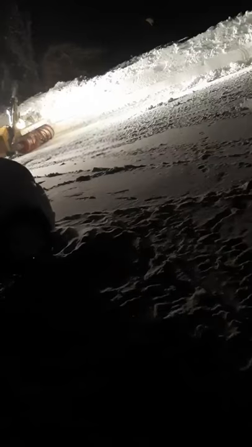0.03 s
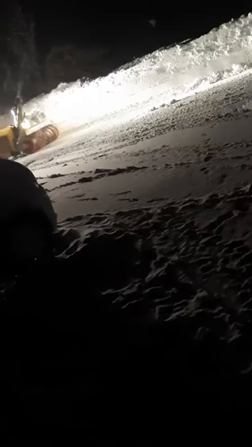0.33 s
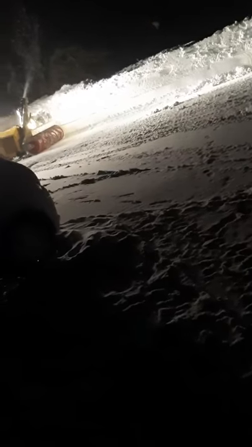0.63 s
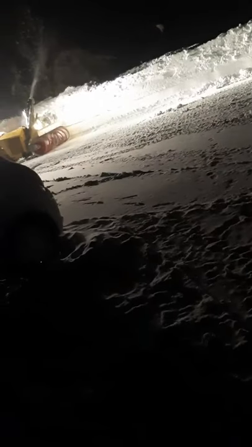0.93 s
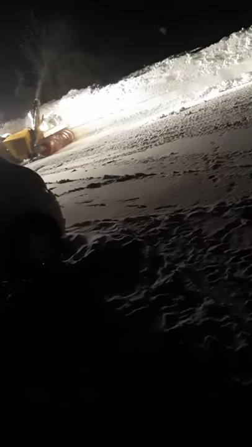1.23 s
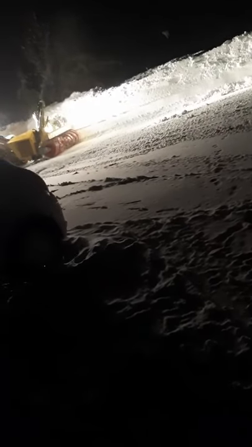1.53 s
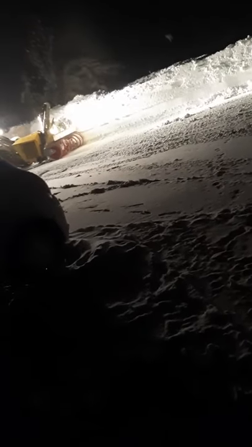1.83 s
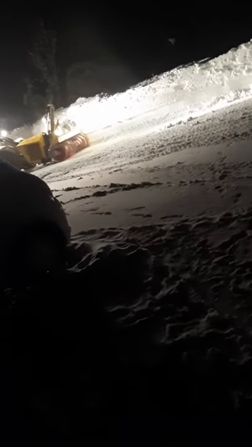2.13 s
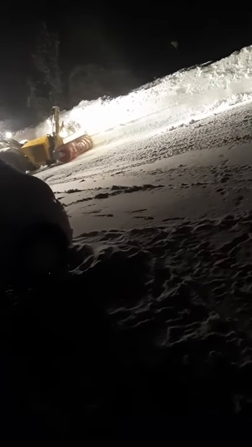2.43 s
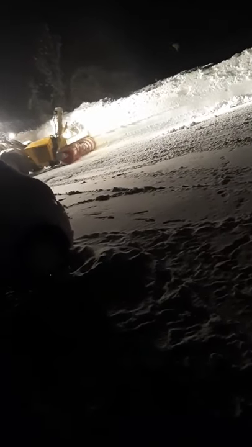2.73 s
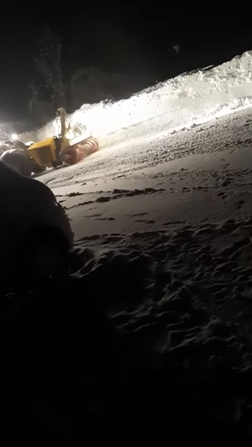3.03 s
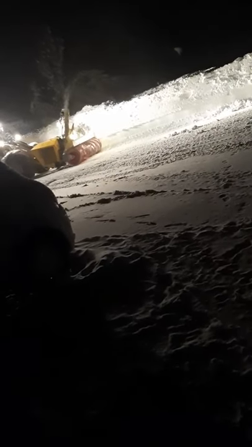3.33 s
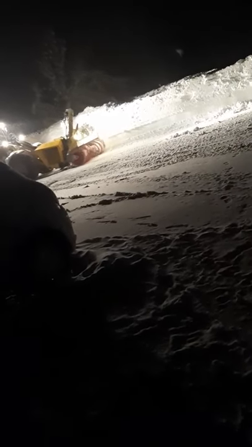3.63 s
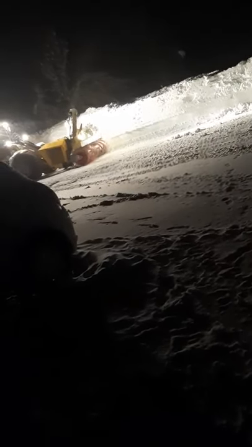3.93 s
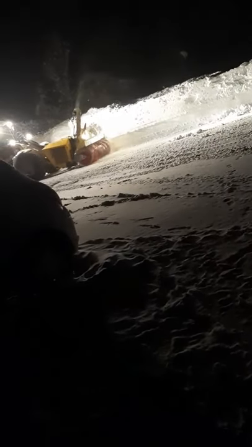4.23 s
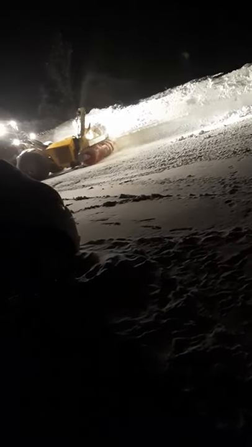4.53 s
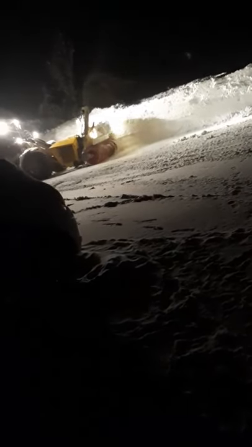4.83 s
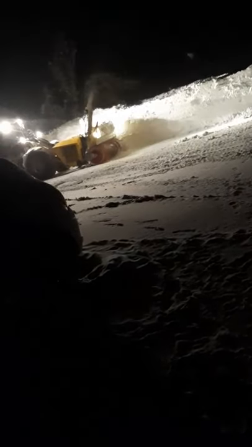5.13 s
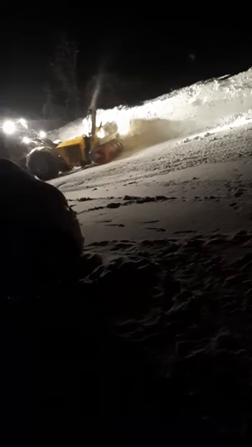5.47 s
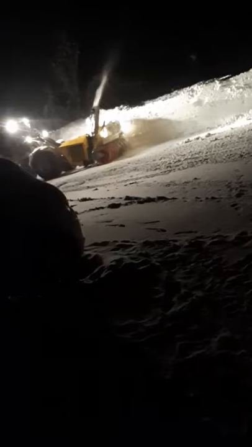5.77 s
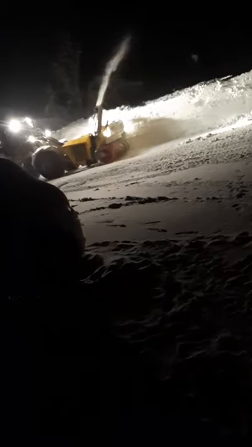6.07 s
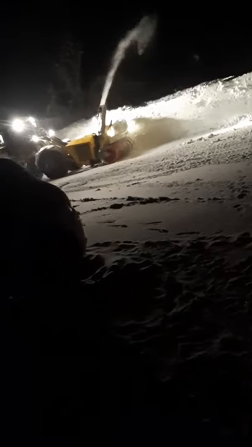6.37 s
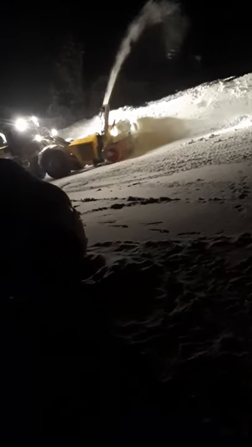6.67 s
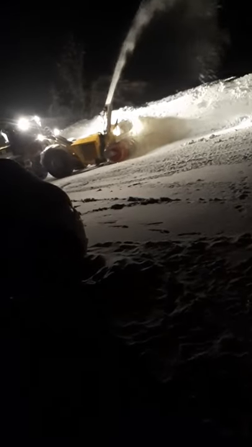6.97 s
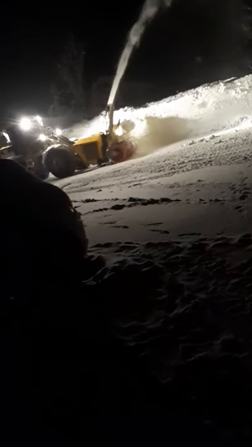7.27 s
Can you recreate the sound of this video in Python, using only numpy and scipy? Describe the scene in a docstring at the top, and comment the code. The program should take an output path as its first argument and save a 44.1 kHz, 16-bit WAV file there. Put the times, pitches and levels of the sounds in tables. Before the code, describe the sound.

A diesel tractor with a front snow blower runs at working speed throughout, outdoors and a little way off. A low engine drone and the throb of the impeller beat slowly against each other, over a rumble, injector clatter and faint gear tones. The sound opens up slightly over the first two seconds. From about 1 to 2.4 seconds a light bite of snow brings a swelling, grainy hiss and a faint, very high turbo whistle. The hiss thins, then swells again around 3.5 seconds, and a few harder engine knocks stand out between 2.5 and 4.4 seconds. At about 5.1 seconds a chip of ice lightly strikes the chute. From 5.3 seconds the auger digs deep: the hiss returns, a rough growl builds from about 6 seconds, the engine sags very slightly, and the turbo whistle climbs and grows until the end at 7.4 seconds.

```python
"""A tractor with a front snow blower creeps out from behind a snow bank at night, diesel at working speed.
From the start the impeller throbs at nearly half the firing rate, so the two beat slowly, while
injectors clatter and gears sing. A light first bite of snow stirs the turbo, and the hiss swells and
thins as loose snow goes up the chute. After five seconds an ice chip strikes the chute; then the auger
bites deep: the packed impeller growls, the speed sags a little and the turbo whistles up."""
import sys
import numpy as np
from scipy import signal
from scipy.fft import rfft, irfft
from scipy.io import wavfile
from scipy.ndimage import uniform_filter1d

SR = 44100
rng = np.random.default_rng(int(sys.argv[2]) if len(sys.argv) > 2 else 0)


def wrap_up_sound(samples):
    """Save the sound to the file named by the first command line argument, as 16-bit audio."""
    columns = np.atleast_2d(samples).T
    # keep every value between -1 and 1, then stretch to whole-number steps
    tamed = np.clip(columns, -1, 1)
    steps = np.round(tamed * 32767).astype(np.int16)
    wavfile.write(sys.argv[1], SR, steps)


N = 326340
TIME = np.arange(N) / SR
FREQS = np.maximum(np.arange(N // 2 + 1) * SR / N, 1)

BLADE_HZ, DROOP_HZ = 36.586, .306  # the governor holds the blade rate, giving a little under load
BLADES_PER_CYCLE = 1.96625  # blade passes per engine cycle
BLADE_START, CRANK_OFFSET = .42, -.1  # in blade passes, in engine cycles
KNOCK_LAG, TICK_LAG = .16, .19  # engine cycles after each exhaust pulse
PACK_FROM, PACK_FULL = .39, 1  # loads at which snow starts to pack the impeller, and fills it
EMERGE_S, EMERGE_FADE_S = .64, 1.0  # when the bank's shielding starts to fade, and its time constant

# The impeller's throb. Each row: multiple of the blade rate, level in dB, how strongly it follows
# the bank's shielding as a factor, dB gained when packed.
THROB_PARTIALS = [(2, -33.5, 0.8, 6.5), (3, -29.5, 0.14, 1.5), (4, -38, 0, 10.5), (5, -26.5, 0.8, -2),
                  (6, -28.5, 0.9, -1.5), (7, -41, 2.2, 0), (8, -49.5, 1.0, 1)]
# The throb shifts as the tractor moves. Each row: time in seconds, dB added to partial 3, to partial 5.
THROB_SWELLS = [(0, 1, 1), (1.3, 0.5, -1), (2.2, 0.5, -2.1), (3.2, 0.6, 0.8), (4.301, -1, 1.2),
                (5.6, -3.5, -3), (6.901, -2, -2.5)]
# The voice of the snow-packed housing. Each row: frequency in Hz, gain in dB.
PACKED_HOUSING = [(330, 1), (370, -4), (430, -16), (540, -9), (585, 0), (622, 2.5), (658, -6), (695, 3),
                  (732, 2.5), (765, -8), (860, -9), (950, -3), (1020, -5), (1080, -8), (1130, -5)]
# Lumps of snow make the growl surge. Each row: centre in seconds, half length in seconds, boost in dB.
SNOW_LUMPS = [(6.79, .05, 4), (7.3, .1, 2)]
# The auger's bites. Each row: start in seconds, end in seconds, load it builds toward (1 is full).
AUGER_BITES = [(1.0, 2.39, .58), (5.28, 7.4, 1.5)]
# The exhaust's drone. Each row: multiple of the engine cycle, level in dB.
EXHAUST_ORDERS = [(4, -26.1), (5, -54), (6, -43), (7, -53), (8, -41), (9, -52), (10, -51), (11, -52),
                  (12, -49), (13, -51), (14, -55), (15, -53), (16, -57), (17, -57), (18, -55), (19, -57),
                  (20, -58), (21, -58)]
# Four cylinders in firing order. Each row: accents in dB for block knock, valve cover rattle and
# injector tick, then knock delay in firing intervals.
CYLINDER_ACCENTS = [(2, -1, 3, .2), (7, 0, 1.5, 0), (-1.5, 1, 0, .16), (-4.5, 0, 0, .12)]
# Knocks that stand out from the rest. Each row: time in seconds, level in dB.
KNOCK_HITS = [(.328, -32), (2.479, -30), (2.910, -29), (2.974, -32), (3.028, -31), (3.082, -32),
              (3.125, -29), (4.146, -29), (4.414, -28)]
# Harder rasp in the first bite. Each row: centre in seconds, half length in seconds, boost in dB.
INJECTOR_SWELLS = [(1.9, 0.5, 1)]
# Gear tones. Each row: multiple of the engine cycle, relative level in dB, dB gained when packed.
GEAR_TONES = [(52, -56, 5), (59, -55, 3), (63.93, -49, 9), (69.97, -52, 13), (71.8, -58, 9),
              (73.8, -57, 10), (81.1, -55, 9), (90, -55, 0), (110, -61, 5), (145, -54, 3), (225, -59, 0)]
# The turbo whistle comes and goes. Each row: time in seconds, level change in dB.
WHISTLE_SWELLS = [(0, -6), (1.0, -1), (2.0, 2), (2.5, -5), (3.45, 6), (4.2, -8), (5.2, -1), (5.5, -3),
                  (5.72, 7), (6.0, -2), (6.65, 2), (7.4, -1)]
# The hydraulic motor's wandering hum. Each row: time in seconds, pitch in Hz.
MOTOR_PITCH = [(0.0, 54.8), (1.79, 52), (4.18, 52.66), (5.89, 48.5), (6.1, 58.1), (7.21, 53.8), (7.4, 59.5)]
# Thick and thin snow in the chute. Each row: centre in seconds, half length in seconds, flow in dB.
SNOW_PATCHES = [(1.97, 1, 9), (2.75, 0.61, -8.5), (3.556, 0.43, 9), (4.13, .22, -2), (5.6, 0.86, 4),
                (7.136, 0.26, 7.5)]
# Ice striking the chute. Each row: time in seconds, level in dB.
CHIP_HITS = [(5.148, -30.5)]

# Tone colours of the noisy layers. Each row: frequency in Hz, relative level in dB.
RUMBLE_COLOUR = [(25, -18), (45, -11), (70, -6.5), (100, 0), (160, 1), (240, -5.5), (300, -13.5),
                 (400, -14.5), (480, -22.5), (800, -37.5)]  # air in the impeller housing
BLOCK_COLOUR = [(500, -10.5), (850, -12), (1050, -6), (1250, 4), (1400, 1), (1550, 0), (1800, -10),
                (2200, -28), (3000, -58)]  # engine block
COVER_COLOUR = [(1400, 2), (1850, 6.5), (2080, 10), (2350, 6.5), (2700, 12.5), (2900, 1.5), (3080, -3.5),
                (3300, -32), (3550, -2), (3900, -14.5)]  # valve cover
PIPE_COLOUR = [(3400, -15), (3620, 9), (3800, -5.5), (3930, -6), (4180, 4), (4400, 5.5), (4520, -15),
               (4700, 3), (5000, -12.5), (5500, -2.5), (5900, -10.5)]  # injectors and their steel pipes
CHURN_COLOUR = [(300, -36), (470, 0), (650, -0.5), (850, 1.5), (1000, 0.5), (1300, -8)]  # snow in the auger housing
HISS_COLOUR = [(2600, 0), (3400, -5), (4250, 0), (5300, -4), (6200, -10), (7000, -3.5), (7900, -8.5),
               (8500, -28), (9700, -22), (10500, -14), (12000, -17), (12900, -27)]  # grains on steel
SPRAY_COLOUR = [(5000, -22), (7500, 11), (8600, -30), (9700, -11), (10600, 5), (12000, 4), (13000, -5)]  # the airy top of the snow spray
CHUTE_COLOUR = [(1800, 0), (2400, 3), (2900, 0), (3300, 7), (3900, -3), (6000, -11), (7500, -7),
                (8800, -22), (11000, -20)]  # the struck chute

# The stereo image. Each row: frequency in Hz, left minus right in dB.
STEREO_BALANCE = [(60, -2), (140, -2), (310, -5), (470, -4), (710, 3.5), (1070, -4.5), (1620, -3.5),
                  (2440, -3.5), (3700, -0.5), (8400, 3.5), (12700, -0.5)]
# The right side lags, most in the bass, which bends round the microphones.
# Each row: frequency in Hz, lag in seconds.
RIGHT_LAG = [(250, 0.00021), (1300, 0.00011), (2500, 0.00015), (5000, 0.0001965)]


def impeller(blade, shield_db, packed, growl_db):
    """Each blade pushes a puff: bass leaves the housing at once, the rest by the chute, late, inverted."""
    chute_from = 4  # lowest partial that takes the chute
    chute = blade - .078  # delay in blade passes
    swells = dict(zip((3, 5), in_time(THROB_SWELLS)))
    throb = growl = 0
    for k, db, follows, packed_db in THROB_PARTIALS:
        turns = k * blade if k < chute_from else k * chute + .5
        level_db = db + follows * shield_db + packed_db * packed + swells.get(k, 0)
        throb += tone(turns, level_db, waver_db=.35, waver_hz=2, jitter=.04)
    # packed snow adds a growl of rough upper partials
    for k in range(9, 32):
        partial = tone(k * chute + .35 * rng.random(), growl_db, waver_db=3, waver_hz=18, jitter=.7)
        growl += gain_at(PACKED_HOUSING, k * BLADE_HZ) * partial
    return throb + np.sqrt(packed) * from_db(bumps(SNOW_LUMPS)) * growl


def exhaust(cycle, gain_db):
    """The firing note, trailed by the weaker orders that unequal cylinders leave."""
    uneven_lag, smeared_above = .287, 8  # engine cycles; the silencer smears phases above this order
    drone = 0
    for k, db in EXHAUST_ORDERS:
        lag = uneven_lag * (k != len(CYLINDER_ACCENTS))
        smear = rng.random() * (k > smeared_above)
        drone += from_db(db) * sine(k * (cycle - lag) + smear)
    return from_db(gain_db) * drone


def rumble(blade, level_db, depth, lag, diffuse_hz):
    """Turbulence in the housing, pumped by each blade; its upper part arrives from all sides."""
    pumping = 1 + depth * np.cos(2 * np.pi * (blade - lag))
    low_cut = np.minimum(FREQS / diffuse_hz, 1) ** 2
    diffuse = irfft(rfft(rng.standard_normal((2, N))) * low_cut, N)
    return from_db(level_db) * colour(pumping * (rng.standard_normal(N) + diffuse), RUMBLE_COLOUR)


def diesel(cycle, level_db, cover_db):
    """The cylinders knock in the block, two of them hard, and rattle more brightly in the valve cover."""
    knock_db, rattle_db, _, delays = np.transpose(CYLINDER_ACCENTS)
    knocks = firings(cycle - KNOCK_LAG, knock_db, decay=.3, base=.85, uneven_db=1, delays=delays)
    block = clatter(cycle, knocks, BLOCK_COLOUR, repeat=.45, scatter=.27)
    taps = firings(cycle - TICK_LAG, rattle_db, decay=.16, base=1.2, uneven_db=1.6)
    cover = clatter(cycle, taps, COVER_COLOUR, repeat=.3, scatter=.18)
    hard_knocks = strikes(KNOCK_HITS, BLOCK_COLOUR, contact_s=.003)
    return from_db(level_db) * (block + from_db(cover_db) * cover) + hard_knocks


def injectors(cycle, level_db):
    """Each injection ticks and sets the steel pipes ringing: a coarse, regular rasp."""
    tick_db = np.array(CYLINDER_ACCENTS)[:, 2]
    ticks = firings(cycle - TICK_LAG, tick_db, decay=.2, base=1.1, uneven_db=2.5)
    rasp = clatter(cycle, ticks, PIPE_COLOUR, repeat=.35, scatter=.4)
    return from_db(level_db + bumps(INJECTOR_SWELLS)) * rasp


def gears(cycle, gain_db, packed):
    """Timing gears and gearbox sing; most tones rise with the torque of a packed impeller."""
    tones = sum(tone(k * cycle + rng.random(), db + packed_db * packed, waver_db=3, waver_hz=22, jitter=.79)
                for k, db, packed_db in GEAR_TONES)
    return from_db(gain_db) * tones


def churn(blade, level_db, packed, depth):
    """Snow tumbles in the auger housing: an even roar that pulses with the blades once they pack."""
    pumping = 1 + depth * packed * np.cos(2 * np.pi * (blade - BLADE_START))
    return from_db(level_db) * colour(scattered_noise(pumping, scatter=.15), CHURN_COLOUR)


def turbo(load, idle_db, boost_db, blur_hz, flutter_hz, echo_gain):
    """The compressor whistle climbs, grows and flutters as the turbo spools up; its echoes blur it."""
    idle_hz, rise_hz, spool_s = 10399, 1374, .51
    pole = np.exp(-1 / (spool_s * SR))
    boost = load
    for _ in range(2):  # the spool lags behind the load
        boost = signal.lfilter([1 - pole], [1, -pole], boost)
    hz = idle_hz + rise_hz * boost + flutter_hz * boost ** 2 * drift(60)
    angle = 2 * np.pi * np.cumsum(hz) / SR
    direct, left, right = [np.sqrt(2) * np.cos(angle + drift(blur_hz)) for _ in range(3)]
    swell_db, = in_time(WHISTLE_SWELLS)
    level_db = idle_db + boost_db * boost ** 1.5 + swell_db + 2 * drift(4)
    return from_db(level_db) * (direct + echo_gain * np.array([left, right]))


def hydraulics(cycle, motor_db, pump_db):
    """The hydraulic motor hums at a wandering pitch of its own; its pump is geared to the engine."""
    motor_hz, = in_time(MOTOR_PITCH)
    motor = tone(np.cumsum(motor_hz) / SR, motor_db, waver_db=4.5, waver_hz=2.5, jitter=.059)
    pump = tone(11.43 * cycle, pump_db, waver_db=1.2, waver_hz=2, jitter=.1)
    return motor + pump


def hiss(cycle, level_db, spectrum, grain_db, flutter_db):
    """Snow grains on steel: bright, grainy, pulsing with the knocks of the firings."""
    knock_db = np.array(CYLINDER_ACCENTS)[:, 0]
    ticks = firings(cycle - KNOCK_LAG, knock_db, decay=.35, base=2.4, uneven_db=1.5)
    grains = scattered_noise(ticks * from_db(grain_db * drift(360)), scatter=.98)
    return from_db(level_db + flutter_db * drift(11)) * colour(grains, spectrum)


def strikes(rows, spectrum, contact_s):
    """Single rough blows ring a body; each carries the energy of four milliseconds at its level."""
    count = 4096
    track, ring = np.zeros(N + count), ringing(spectrum)
    for s, db in rows:
        contact = rng.standard_normal(count) * np.exp(-TIME[:count] / contact_s)
        blow = signal.fftconvolve(contact, ring)[:count]
        start = int(s * SR)
        track[start:start + count] += from_db(db) * blow * np.sqrt(.004 * SR / np.sum(blow ** 2))
    return track[:N]


def engine_load(build_s, release_s):
    """Load builds while the auger is in a bite and falls quickly once it is through."""
    load = 0
    for start, end, depth in AUGER_BITES:
        build = 1 - np.exp(-np.clip(TIME - start, 0, end - start) / build_s)
        release = np.exp(-np.maximum(TIME - end, 0) / release_s)
        load += depth * build * release
    return load


def firings(cycle, accent_db, decay, base, uneven_db, delays=(0, 0, 0, 0)):
    """An envelope of uneven hits over a steady base: sharp attack, decay in firing intervals."""
    firing = len(accent_db) * cycle
    index = np.floor(firing).astype(int)
    cylinder = index % len(accent_db)
    chance = rng.standard_normal(1024)
    strength = from_db(accent_db[cylinder] + uneven_db * chance[index % len(chance)])
    since = firing - index - np.asarray(delays)[cylinder]
    return rms_one(base + strength * (since >= 0) * np.exp(-np.abs(since) / decay))


def clatter(cycle, blows, spectrum, repeat, scatter, even_s=.16):
    """Blows rattle the engine much alike every cycle, at an even level; a share arrives scattered wide."""
    direct, left, right = repeating_noise(cycle, repeat)
    noise = np.sqrt(1 - scatter) * direct + np.sqrt(scatter) * np.array([left, right])
    rattle = colour(blows * noise, spectrum)
    power = uniform_filter1d(np.mean(rattle ** 2, axis=0), int(even_s * SR))
    return rattle / np.sqrt(power)


def repeating_noise(cycle, repeat, morph_hz=.12):
    """Three unrelated noises: a share loops every engine cycle, slowly morphing; the rest is fresh."""
    count = 2048
    place, angle = cycle % 1 * count, 2 * np.pi * morph_hz * TIME
    pattern = 0
    for weight in (np.cos(angle), np.sin(angle)):
        loops = [np.interp(place, np.arange(count), row) for row in rng.standard_normal((3, count))]
        pattern += weight * np.array(loops)
    return np.sqrt(repeat) * rms_one(pattern) + np.sqrt(1 - repeat) * rng.standard_normal((3, N))


def scattered_noise(envelope, scatter):
    """Shaped noise, part direct and part scattered off the snow banks, different on each side."""
    direct = rms_one(envelope * rng.standard_normal(N))
    wide = rms_one(envelope * rng.standard_normal((2, N)))
    return np.sqrt(1 - scatter) * direct + np.sqrt(scatter) * wide


def microphones(x):
    """The machine is off to the left, so the right side hears it later; each side has its own colour."""
    held_hz = np.clip(FREQS, STEREO_BALANCE[0][0], STEREO_BALANCE[-1][0])
    tilt = np.sqrt(gain_at(STEREO_BALANCE, held_hz))
    lag_s = np.interp(FREQS, *np.transpose(RIGHT_LAG))
    delay = np.exp(-2j * np.pi * FREQS * lag_s)
    return irfft(rfft(x) * np.array([tilt, delay / tilt]), N)


def tone(turns, db, waver_db, waver_hz, jitter):
    """A sine that wavers around an rms level, its phase shaken by jitter in radians."""
    shake = jitter * drift(waver_hz) / (2 * np.pi)
    return from_db(db + waver_db * drift(waver_hz)) * sine(turns + shake)


def sine(turns):
    """A pure tone at rms 1."""
    return np.sqrt(2) * np.cos(2 * np.pi * turns)


def drift(hz):
    """A random wobble with spread 1, mostly slower than hz."""
    count = 6144
    f = np.arange(count // 2 + 1) * SR / N
    slow = irfft(rfft(rng.standard_normal(count)) / (1 + (f / hz) ** 2), count)
    return np.interp(TIME, np.linspace(0, TIME[-1], count), rms_one(slow))


def colour(x, spectrum):
    """Pass a sound through a body with this spectrum; rms 1."""
    return rms_one(signal.oaconvolve(np.atleast_2d(x), ringing(spectrum)[None], axes=1)[:, :N])


def ringing(spectrum):
    """What one tap sets off in a body with this spectrum: a sharp start, then the ring."""
    count = 4096
    hz = np.maximum(np.arange(count // 2 + 1), .5) * SR / count
    cepstrum = irfft(np.log(gain_at(spectrum, hz)))
    cepstrum[1:count // 2] *= 2  # folding to minimum phase puts the attack first
    cepstrum[count // 2 + 1:] = 0
    return irfft(np.exp(rfft(cepstrum)))


def gain_at(spectrum, hz):
    """Gain along an EQ curve, falling 20 dB per octave beyond its ends."""
    f, db = np.transpose(spectrum)
    octaves_outside = np.maximum(np.log2(f[0] / hz), 0) + np.maximum(np.log2(hz / f[-1]), 0)
    return from_db(np.interp(np.log(hz), np.log(f), db) - 20 * octaves_outside)


def in_time(rows):
    """One automation curve for each column after the time."""
    s, *columns = np.transpose(rows)
    return [np.interp(TIME, s, column) for column in columns]


def bumps(rows):
    """Smooth swells and dips in dB."""
    return sum(db * np.exp(-((TIME - s) / half_s) ** 2) for s, half_s, db in rows)


def from_db(db):
    """Decibels to gain."""
    return np.exp(np.asarray(db) * (np.log(10) / 20))


def rms_one(x):
    """Scale to rms 1."""
    return x / np.sqrt(np.mean(x ** 2) + 1e-20)


def scene():
    """Engine and impeller are geared together; load, snow flow and the shielding bank ride the mix."""
    load, flow_db = engine_load(build_s=2, release_s=.11), bumps(SNOW_PATCHES)
    packed = np.clip((load - PACK_FROM) / (PACK_FULL - PACK_FROM), 0, 1)
    hidden = np.exp(-np.maximum(TIME - EMERGE_S, 0) / EMERGE_FADE_S)
    blade = BLADE_START + np.cumsum(BLADE_HZ - DROOP_HZ * load) / SR
    cycle = blade / BLADES_PER_CYCLE + CRANK_OFFSET

    def fader(db, hidden_db, packed_db, flow_share=0):
        """A level in the open, moved by the bank, a packed impeller and the flow of snow."""
        return db + hidden_db * hidden + packed_db * packed + flow_share * flow_db

    engine = (exhaust(cycle, fader(0, hidden_db=-2.8, packed_db=-2.2))
              + gears(cycle, fader(4, hidden_db=-13.5, packed_db=-4), packed)
              + diesel(cycle, fader(-37.5, hidden_db=-4, packed_db=4), cover_db=-4)
              + injectors(cycle, fader(-46.5, hidden_db=-6.5, packed_db=-.5, flow_share=.21))
              + turbo(load, idle_db=-72.5, boost_db=52, blur_hz=30, flutter_hz=70, echo_gain=.6))
    rumble_db = fader(-33, hidden_db=.5, packed_db=2.5)
    blower = (impeller(blade, shield_db=-7.8 * hidden, packed=packed, growl_db=-48.3)
              + rumble(blade, rumble_db, depth=.086, lag=.81, diffuse_hz=423))
    auger = (churn(blade, fader(-41.5, hidden_db=-2, packed_db=-6), packed, depth=.44)
             + hydraulics(cycle, motor_db=-43.5, pump_db=-45))
    hiss_db = fader(-49, hidden_db=-.5, packed_db=2.5, flow_share=.34)
    spray_db = fader(-59.5, hidden_db=-12, packed_db=0, flow_share=.73)
    snow = (hiss(cycle, hiss_db, HISS_COLOUR, grain_db=-1, flutter_db=2)
            + hiss(cycle, spray_db, SPRAY_COLOUR, grain_db=.5, flutter_db=-1)
            + strikes(CHIP_HITS, CHUTE_COLOUR, contact_s=.0049))
    return microphones(engine + blower + auger + snow)


def record(dry):
    """A two-millisecond fade-in after a moment of silence, and a steep cut of the top end."""
    start_s, cutoff_hz = .067, 13100
    fade_in = np.clip((TIME - start_s) / .002, 0, 1)
    high_cut = 1 / np.sqrt(1 + (FREQS / cutoff_hz) ** 400)
    return irfft(rfft(dry * fade_in) * high_cut, N)


dry = scene()
out = record(dry)
wrap_up_sound(out)
```